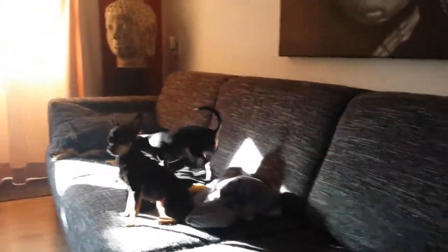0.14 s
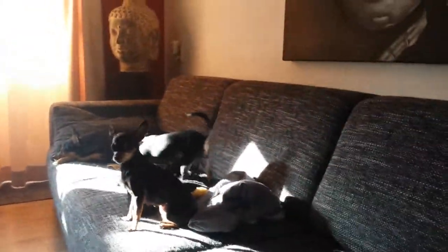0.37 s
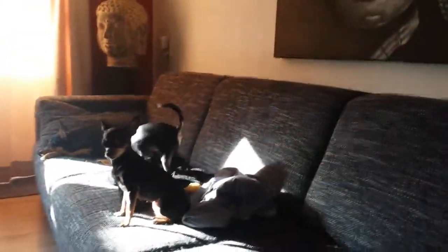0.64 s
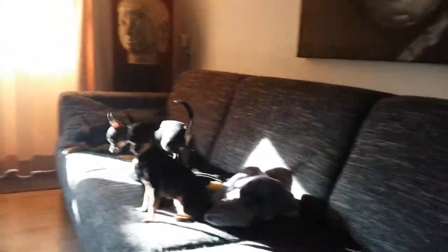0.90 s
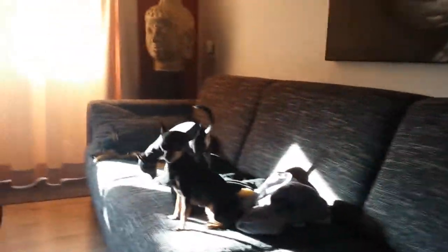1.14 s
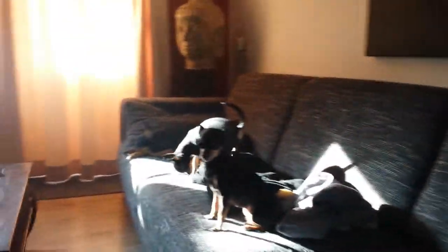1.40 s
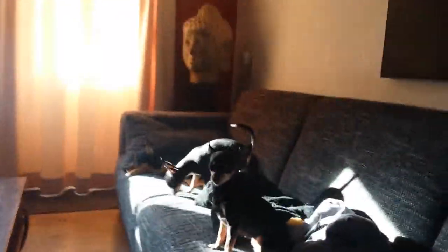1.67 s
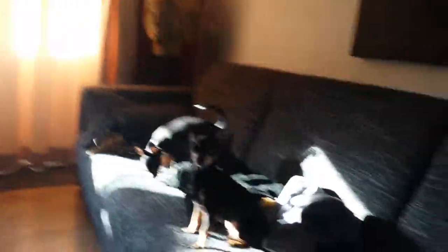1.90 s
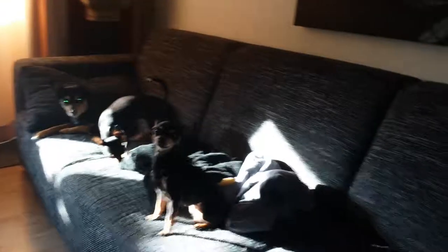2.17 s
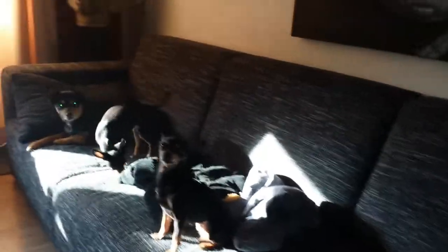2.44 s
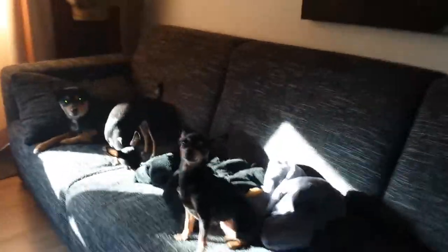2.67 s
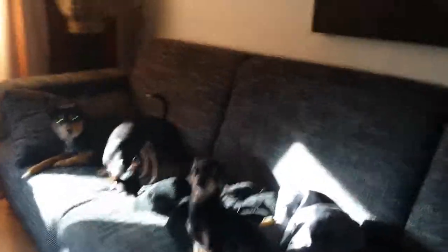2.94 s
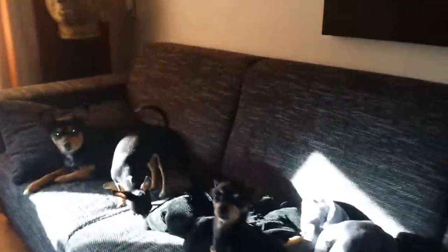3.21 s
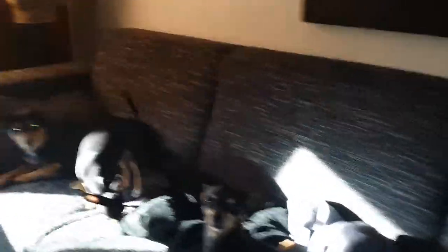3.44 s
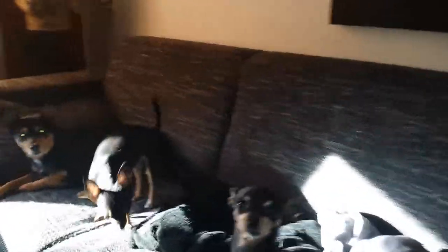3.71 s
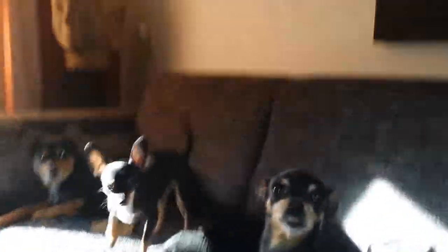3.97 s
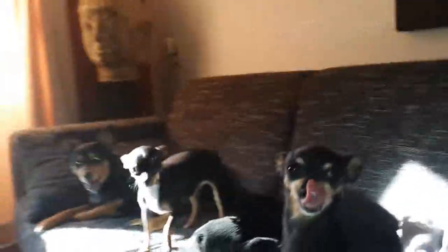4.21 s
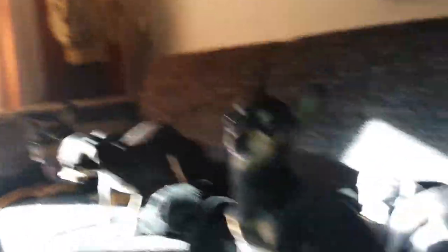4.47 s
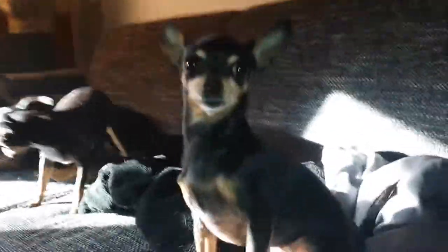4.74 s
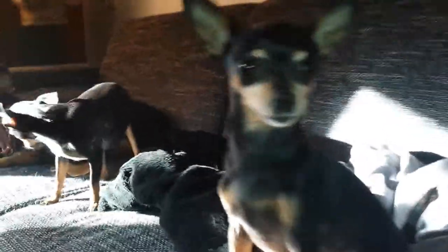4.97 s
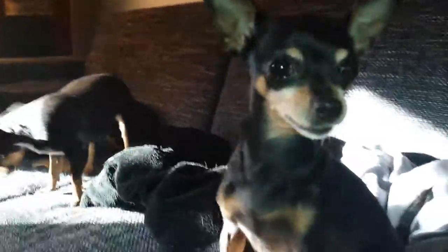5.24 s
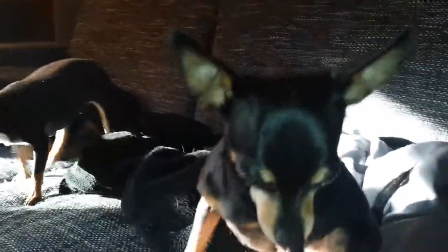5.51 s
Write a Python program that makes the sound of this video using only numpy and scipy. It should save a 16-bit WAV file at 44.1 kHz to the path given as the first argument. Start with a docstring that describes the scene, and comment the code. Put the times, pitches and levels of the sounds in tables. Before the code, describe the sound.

Dry clicks from a gripped device and soft blanket rubbing, then bright ripping scratches as claws pull off fabric, with padded paw thumps and low cushion rumble. The scratches come in spaced bursts and weaken. A dull bump on the sofa frame and handling rumble follow, then a faint wavering hum in a small living room. Wide, uneven handheld stereo.

```python
"""Small dogs scramble on a fabric sofa: grip ticks and rustling cloth (shaped noise) come first, with a few
faint claw snaps (noise bursts) and paw thumps (damped sines); from 0.65 s these grow loud, thinning by 3.5 s.
At 4 s the housing of the hand-held camera wobbles and the sofa frame is knocked (ringing modes); a hand rubs
the housing at 4.3 and 5.2 s (noise and a run of pats). An appliance hum (unsteady sines) wavers, and is
weaker after 4.5 s. Two unlike ports hear it, the left ringing near 6 kHz."""
import sys
import numpy as np
from scipy import signal
from scipy.fft import rfft, irfft, next_fast_len
from scipy.io import wavfile

SR = 44100
rng = np.random.default_rng(int(sys.argv[2]) if len(sys.argv) > 2 else 0)


def to_wav(sig):
    """Store sig (one row per channel, or 1-D mono) as 16-bit WAV at the path in sys.argv[1].

    Samples outside -1..1 are clipped; the rate is SR.
    """
    pcm = np.clip(np.atleast_2d(sig), -1, 1) * 32767
    pcm = np.round(pcm).astype(np.int16)
    wavfile.write(sys.argv[1], SR, pcm.T)  # frames by channels


def ratio(d):
    """dB to gain"""
    e = np.asarray(d, float) / 20
    return 10 ** e


N = 247842


def unit(x):
    """Scale to rms 1."""
    return x / np.sqrt(np.mean(x ** 2) + 1e-20)


def sides(left_db, right_db):
    """Left and right gains as two rows, from constants or curves in dB."""
    return ratio(np.array([left_db, right_db])).reshape(2, -1)


def along(points, hz):
    """Interpolate (Hz, value) points on a log frequency axis."""
    f, v = np.transpose(points)
    return np.interp(np.log(hz + 1), np.log(f + 1), v)


def curves(rows):
    """One value per sample for each column after the time."""
    s, *cols = np.transpose(rows)
    return [np.interp(np.arange(N) / SR, s, c) for c in cols]


def swells(bed_db, s, rise_s, t60_s, db):
    """Level in dB of a bed plus events that climb 25 dB in the rise time and die away; powers add."""
    t = np.arange(0, N + 32, 32) / SR - np.reshape(s, (-1, 1))
    climb_db = -25 * t / rise_s[:, None]
    decay_db = 60 * t / t60_s[:, None]
    drop_db = np.where(t < 0, climb_db, decay_db)
    power = np.sum(ratio(db[:, None] - drop_db) ** 2, axis=0)
    power = np.interp(np.arange(N) / 32, np.arange(power.size), power)
    return 10 * np.log10(ratio(bed_db) ** 2 + power)


def filtered(x, response):
    """x times a complex response of frequency."""
    m = 2 * next_fast_len(x.shape[-1] // 2 + 4096)
    spectrum = rfft(x, m) * response(np.fft.rfftfreq(m, 1 / SR))
    return irfft(spectrum, m)[..., :x.shape[-1]]


def causal(db):
    """Minimum-phase response of a gain curve, by folding its cepstrum."""
    c = irfft(db * np.log(10) / 20)
    half = c.shape[-1] // 2
    c[..., 1:half] *= 2
    c[..., half + 1:] = 0
    return np.exp(rfft(c))


# Port colours. Each row: frequency in Hz, relative gain in dB.
LEFT_PORT = [(300, -19.5), (1000, -15), (1850, -17), (2500, -22.5), (3500, -15), (5000, -6.5), (5900, -3.5),
             (6300, -5), (7200, -21.5), (10000, -27.5), (14000, -53)]
RIGHT_PORT = [(300, -17), (1000, -15.5), (2200, -25.5), (3300, -17.5), (4200, -15.5), (6000, -14.5),
              (7600, -12.5), (8600, -16), (10000, -18.5), (14000, -22.5)]


def ports(x, colour):
    """A source colour as the left and right ports hear it, each response of unit energy."""
    hz = np.fft.rfftfreq(n=4096, d=1 / SR)
    port_db = np.array([along(LEFT_PORT, hz), along(RIGHT_PORT, hz)])
    ring = irfft(causal(along(colour, hz) + port_db))
    ring = ring / np.linalg.norm(ring, axis=1, keepdims=True)
    return signal.oaconvolve(x, ring, axes=1)[:, :N]


# Likeness of the channels. Each row: frequency in Hz, left-right likeness from 0 to 1.
LIKENESS = [(40, 0.18), (130, 0.78), (300, 0.91), (650, 0.5), (1400, .15), (4000, 0.039)]


def rush(grit_db, per_s):
    """Stereo noise, alike in the bass, whose level wanders between random values, per_s of them a second."""
    jumps_db = grit_db * rng.standard_normal(size=8192)
    level_db = np.interp(np.arange(N) * per_s / SR, np.arange(jumps_db.size), jumps_db)
    pair = unit(rng.standard_normal((2, N)) * ratio(level_db))

    def mid_side(hz):
        turn = np.arccos(np.clip(along(LIKENESS, hz), 0, 1)) / 2
        return np.array([np.cos(turn), np.sin(turn)])

    mid, side = filtered(pair, mid_side)
    return np.array([mid + side, mid - side])


def blows(times_s, level_db, life_s, low_hz, high_hz):
    """Noise bursts that swell and fade, sized by their energy in a band; one row of levels per channel."""
    life_s = np.reshape(life_s, (-1, 1))
    u = np.arange(512) / SR / life_s
    burst = rng.standard_normal((len(times_s), u.shape[1])) * (u + 0.32) * np.exp(-u)
    hz = np.fft.rfftfreq(u.shape[1], 1 / SR)
    in_band = np.abs(rfft(burst)[:, (hz > low_hz) & (hz < high_hz)]) ** 2
    energy = SR * (0.00015 + 0.22 * life_s)  # the port's ring plus the burst's own length
    burst *= np.sqrt(energy / in_band.mean(axis=1, keepdims=True))
    start = np.round(np.asarray(times_s) * SR).astype(int)
    at = (start[:, None] + np.arange(u.shape[1])).ravel()
    gains = ratio(np.array(level_db))
    return np.array([np.bincount(at, (burst * g[:, None]).ravel(), N + SR)[:N] for g in gains])


# Room decay. Each row: frequency in Hz, t60 in seconds.
ROOM_T60 = [(200, 0.2), (1000, 0.88), (4000, 0.56), (10000, 0.043), (15000, 0.39)]


def room(x, early_db, gap_s):
    """Diffuse room answer, a new noise tail every quarter second; each frequency dies at its own speed."""
    step, out = SR // 4, np.zeros((2, N + 2 * SR))
    for at in range(0, N, step):
        hz, t, z = signal.stft(rng.standard_normal((2, SR // 2)), SR, nperseg=256)
        late = ratio(-60 * t / along(ROOM_T60, hz)[:, None])
        early = 1 + ratio(early_db - 60 * t / 0.024)
        shape = late * early * np.clip(t / gap_s, 0, 1)
        tail = signal.istft(z * shape, SR, nperseg=256)[1]
        wet = signal.fftconvolve(x[:, at:at + step], tail / np.linalg.norm(tail[0]), axes=1)
        out[:, at:at + wet.shape[1]] += wet
    return out[:, :N]


# Paws drag over the cover. Each row: time of full strength in seconds, rise in seconds, t60 in seconds,
# weave hiss in dB at the right, duller scuff in dB at the right.
STROKE_ROWS = [(.128, 0.43, 0.12, -51.5, -50.5), (.155, 0.066, 0.061, -64, -45.5),
               (.277, 0.16, 0.73, -51.5, -53.5), (.545, 0.032, 0.24, -27.5, -40.5),
               (.595, 0.15, 0.2, -27, -40), (0.655, 0.0078, 0.38, -24.5, -41.5),
               (0.689, 0.03, 0.56, -21.5, -41), (.737, 0.059, 0.21, -37, -52),
               (0.941, 0.0055, 0.2, -32.5, -50), (1.266, 0.0055, 0.49, -32.5, -48),
               (1.517, 0.0035, 0.47, -28, -46.5), (1.576, .05, 0.9, -45.5, -54),
               (1.701, .005, 0.28, -35.5, -54), (1.735, .03, 0.57, -39.5, -56),
               (2.167, 0.026, 0.59, -37, -49), (2.368, 0.046, 0.45, -52, -47.5),
               (2.467, 0.015, 0.38, -31, -46), (2.615, 0.094, 0.26, -41.5, -69),
               (2.707, 0.0069, 0.55, -38.5, -52.5), (2.773, 0.12, 0.34, -55, -60),
               (3.097, 0.029, 0.34, -42, -53), (3.305, 0.019, 0.56, -55, -61.5),
               (3.473, 0.092, 1.7, -56, -53), (3.7, 0.064, 0.95, -45, -64),
               (4.878, 0.094, 0.52, -70, -72.5), (5.407, 0.056, 0.18, -66.5, -93)]
# Restless bed under the strokes. Each row: time in seconds, hiss in dB at the right, scuff in dB at the right
# before its swells, rumble in dB at the left, base level of faint grip ticks in dB at the left.
BED = [(0, -61, -55, -58, -46), (.2, -64, -61, -71, -52), (.45, -47.5, -54, -52.5, -31),
       (1.05, -45.5, -57, -57.5, -37), (1.24, -48.5, -53.5, -66, -38), (1.45, -62, -59, -69, -37.5),
       (1.9, -50.5, -54, -63, -30.5), (2.14, -52.5, -59.5, -69, -36.5), (2.4, -61, -70, -69, -34.5),
       (2.9, -60, -54, -56, -37), (3.3, -66.5, -59, -58.5, -41), (3.6, -55.5, -60, -61, -45.5),
       (4.42, -57, -59, -60.5, -51), (4.55, -70.5, -68, -65, -44), (4.8, -80, -77.5, -72, -52),
       (5.45, -89.5, -88, -71, -55), (5.62, -90, -70, -68.5, -53)]


def hiss_level():
    """Level of the weave hiss in dB at the right: strokes over the bed."""
    s, rise_s, t60_s, hiss_db, _ = np.transpose(STROKE_ROWS)
    return swells(curves(BED)[0], s, rise_s, t60_s, hiss_db)


# Claws leaving the weave. Each row: time in seconds, level in dB at the right.
SNAP_ROWS = [(0.019, -26), (0.1245, -24), (0.287, -33), (.654, -5.5), (0.671, -4), (0.693, -11),
             (0.7407, -8.5), (0.751, -11.5), (0.939, -14), (0.9466, -26.5), (1.2636, -11), (1.2764, -14),
             (1.328, -22), (1.5141, -9.5), (1.5208, -14), (1.532, -24.5), (1.7015, -20.5), (1.7268, -22.5),
             (1.7419, -19.5), (1.876, -29.5), (2.169, -22), (2.1779, -22), (2.4638, -14.5), (2.4729, -21),
             (2.7034, -31), (2.71, -34), (3.0873, -34)]
# Colour of the weave, also of its hiss. Each row: frequency in Hz, relative level in dB per Hz.
WEAVE_COLOUR = [(1000, -45.5), (2500, -8.5), (3400, -12.5), (4100, -5), (9000, -2), (15000, -13.5)]


def claws():
    """Each snap is two threads letting go; picked threads crackle at the hiss level; the room answers snaps."""
    left_over_right_db, left_lag_s = 5, .0001
    thread_s, thread_db = .0022, -6.5  # second thread after the snap
    pick_db, pick_spread_db = -7.5, 1  # picked threads over the hiss
    s, db = np.transpose(SNAP_ROWS)
    plain = blows(s, [db + 3.5, db - 0.5], life_s=.000005, low_hz=4000, high_hz=9000)

    draws = rng.random(size=(2200, 2))
    s_pick = draws[:, 0] * N / SR
    hiss_db = hiss_level()[(draws[:, 0] * N).astype(int)]
    db_pick = hiss_db + pick_db - pick_spread_db * np.log(draws[:, 1]).clip(-3)

    s = np.r_[s - .0004, s + thread_s, s_pick + .001]
    db = np.r_[db, db + thread_db, db_pick]
    left, right = blows(s, [db + left_over_right_db, db], life_s=0.00095, low_hz=4000, high_hz=9000)
    direct = np.array([np.roll(left, round(left_lag_s * SR)), right])
    return ports(direct + room(plain, early_db=-26.5, gap_s=0.0097), WEAVE_COLOUR)


# Bodies shift weight, cushions rumble. Each row: time of full strength in seconds, rise in seconds,
# t60 in seconds, level in dB at the left.
SHIFT_ROWS = [(.153, 0.18, 0.22, -36.5), (.55, 0.18, 0.8, -50), (0.719, 0.11, 0.53, -36.5),
              (1.334, 0.45, 0.32, -54.5), (1.518, 0.022, 0.82, -50.5), (1.74, 0.39, 0.51, -47),
              (1.88, .15, 0.47, -53), (2.23, 0.48, .6, -51.5), (2.369, 0.035, 2.3, -55),
              (2.754, 0.039, 0.34, -42), (3.29, .02, 0.51, -52), (3.365, 0.061, 0.91, -49.5),
              (3.9, 0.18, 0.58, -48.5), (4.019, 0.011, 0.65, -41), (4.85, .03, 0.45, -58.5)]
# Colours of scuff and rumble. Each row: frequency in Hz, relative level in dB per Hz.
SCUFF_COLOUR = [(500, -8), (1000, -9.5), (1700, -3), (2000, -2), (2400, -1.5), (5000, -19)]
RUMBLE_COLOUR = [(40, -29.5), (120, 1.5), (250, 3), (400, -2), (650, -6), (1200, -30.5)]


def cloth():
    """Blanket and sofa cover rub: gritty hiss, duller scuff, low rumble, all shaped noise."""
    s, rise_s, t60_s, _, db = np.transpose(STROKE_ROWS)
    _, scuff_bed_db, rumble_bed_db, _ = curves(BED)
    hiss_db = hiss_level()
    scuff_db = swells(scuff_bed_db, s, rise_s, 1.24 * t60_s, db)  # scuff outlasts the hiss
    rumble_db = swells(rumble_bed_db, *np.transpose(SHIFT_ROWS))
    hiss = sides(hiss_db + 3.0, hiss_db) * ports(rush(grit_db=1.5, per_s=300), WEAVE_COLOUR)
    scuff = sides(scuff_db + 4.5, scuff_db) * ports(rush(grit_db=2, per_s=120), SCUFF_COLOUR)
    rumble = sides(rumble_db, rumble_db - 2.0) * ports(rush(grit_db=3.5, per_s=70), RUMBLE_COLOUR)
    return hiss + scuff + rumble


# Paws on the cushions. Each row: time in seconds, pad peak in dB before the port gains, pad pitch in Hz.
THUMP_ROWS = [(0.132, -38, 610), (0.148, -34, 390), (0.574, -26, 396), (0.655, -23.5, 377),
              (0.671, -26, 260), (0.685, -30, 330), (0.698, -27, 197), (0.707, -28.5, 333),
              (0.722, -35, 200.5), (0.774, -38, 200), (1.514, -38.5, 355), (1.637, -33.5, 354),
              (1.656, -40.5, 248), (1.721, -39, 575), (1.813, -39.5, 245), (1.868, -38.5, 358),
              (1.894, -48, 188), (2.476, -38, 328), (2.736, -32.5, 294), (2.887, -41, 320),
              (3.291, -41, 303), (3.355, -29.5, 349), (3.383, -36, 327), (3.42, -43.5, 261),
              (4.031, -34, 147), (4.338, -33, 193), (4.836, -49, 171), (4.868, -56.5, 112.5)]
# Cushion resonances. Each row: frequency in Hz, width in Hz, relative gain in dB.
CUSHION_MODES = [(191, 38, -7), (355.5, 76, 7.5), (610, 330, -7)]


def paws():
    """The pressed pad of stuffing rings a few cycles; the push sets the cushion's low resonances going."""
    die_cycles, rise_cycles, contact_cycles = 13, .9, .15  # dies by 60 dB
    body_db = 26  # gain of the cushion under the pad
    s, db, hz = np.transpose(THUMP_ROWS)
    cycles = np.arange(2048) / SR * hz[:, None]
    swell = (1 - np.exp(-cycles / rise_cycles)) * ratio(-60 * cycles / die_cycles)
    ring = -np.sin(2 * np.pi * cycles) * swell
    shove = cycles * np.exp(-cycles / contact_cycles)
    at = np.round((s - .002) * SR).astype(int)[:, None] + np.arange(cycles.shape[1])

    def place(rows, size):
        scaled = rows * (ratio(db) / size)[:, None]
        return np.bincount(at.ravel(), scaled.ravel(), N)[:N] * sides(1.5, -1.0)

    def body(f):
        total = 0
        for k, (centre, width, gain_db) in enumerate(CUSHION_MODES):
            mode = 1j * f * width / (centre * centre - f * f + 1j * f * width)
            total = total + (-1) ** k * ratio(gain_db) * mode
        return total

    pad = place(ring, np.abs(ring).max(axis=1))
    cushion = filtered(place(shove, shove.sum(axis=1)), body)
    thud = pad - ratio(body_db) * cushion
    return thud + ratio(-12.0) * room(thud, early_db=1, gap_s=.006)


# Landing bodies press air out of the stuffing. Each row: time of full strength in seconds, rise in seconds,
# t60 in seconds, level in dB rms at the right.
PUFF_ROWS = [(0.128, 0.018, 0.29, -36), (0.535, 0.065, 0.32, -36.5), (.654, 0.0045, 0.29, -44.5),
             (1.722, 0.0033, .17, -42.5), (1.811, 0.005, 0.27, -46.5), (2.365, .004, 0.72, -49),
             (2.758, 0.003, 0.2, -42), (4.016, .004, 0.24, -36), (4.075, .03, 0.17, -45)]
# Colour of the puffs. Each row: frequency in Hz, relative level in dB per Hz.
PUFF_COLOUR = [(80, -16.5), (250, -3.5), (600, 6.5), (1000, -4), (1500, -7), (2500, -2.5), (3200, -32)]


def landings():
    """Air pressed out by each landing dies away as dull, lumpy noise."""
    air_db = swells(-120, *np.transpose(PUFF_ROWS))
    return sides(air_db + 2.5, air_db) * ports(rush(grit_db=1.0, per_s=200), PUFF_COLOUR)


# Something hard meets the frame. Each row: time in seconds, level in dB before the port gains.
KNOCK_ROWS = [(4.0125, -30), (4.067, -41)]
# Modes of the sofa's wooden frame. Each row: frequency in Hz, mean relative level in dB, t60 in seconds.
FRAME_MODES = [(115, 2, 0.11), (187, -4.5, 0.055), (560, -10.5, 0.13), (705, -5.5, .08), (810, -8, 0.12),
               (1048, -7.5, 0.086), (1370, -12, 0.094), (1700, -16.5, .1), (2040, -23, .12),
               (2207, -20, .12)]


def frame():
    """Each knock rings the frame's modes at new strengths and phases."""
    t, out = np.arange(SR // 4) / SR, np.zeros(N + SR)
    for s, db in KNOCK_ROWS:
        ring = np.zeros(t.size)
        for hz, mode_db, t60_s in FRAME_MODES:
            level = ratio(db + mode_db + rng.normal(0, 2.1) - 60 * t / t60_s)
            ring += level * np.sin(2 * np.pi * hz * t + rng.normal(0, 1))
        out[round(s * SR):][:t.size] += ring * (1 - np.exp(-t / 0.0011))
    pair = out[:N] * sides(1.5, -1.5)
    return pair + ratio(-10.5) * room(pair, early_db=7.5, gap_s=0.0048)


# The grip creeps on the housing. Each row: time in seconds, tick level in dB at the left,
# low knock in dB relative to the tick.
TICK_ROWS = [(0.0559, -14, -37), (0.2732, -21.5, -24), (0.335, -23, -8.5), (0.3535, -22, -15),
             (.3956, -24, -29.5), (.413, -23, -28), (.452, -19, -15), (.5, -19, -29.5), (0.532, -17, -42),
             (0.544, -4, -39.5), (0.5644, -14, -39), (0.586, -6.5, -37.5), (1.2455, -25, -20),
             (1.483, -29, -7), (1.723, -13.5, -6), (1.8134, -14, -9), (1.882, -20.5, -3.5),
             (2.076, -19, -6.5), (2.2916, -23.5, -12), (2.3886, -22.5, -17), (2.8087, -22, -6),
             (2.827, -19.5, -4), (2.839, -22, -11), (2.853, -20.5, -9), (2.877, -23.5, -8.5),
             (2.9997, -23, -6), (3.0318, -25, -2), (3.609, -25, -1.5), (3.8488, -28, -7),
             (3.9361, -24.5, -5), (4.0775, -19.5, -10), (4.2463, -23, -8.5), (4.3358, -13.5, 3.5),
             (4.368, -18, -14), (4.6648, -32.5, -5), (4.7587, -41.5, 0), (5.143, -47.5, -11),
             (5.166, -43, -7), (5.2, -48, -1), (5.234, -34, -6), (5.2796, -37.5, -7), (5.306, -44, -1)]
# Colours of a slipping fingertip and a housing knock. Each row: frequency in Hz, relative level in dB per Hz.
SLIP_COLOUR = [(1000, -45.5), (3500, -25), (5000, -6.5), (6000, -0.5), (7500, 3.5), (12000, -1.5),
               (15000, -11.5)]
HOUSING_COLOUR = [(150, -5.5), (1000, -2.5), (1400, -2.5), (1800, -2), (2300, -1.5), (4000, -7.5),
                  (6000, -33.5)]


def grip():
    """Dry ticks carried by the housing, mostly to the left port, among many fainter ones."""
    s, db, knock_db = np.transpose(TICK_ROWS)
    draws = rng.random(size=(560, 2))
    s_faint = (draws[:, 0] * N + 512) / SR
    base_db = curves(BED)[3][(draws[:, 0] * N).astype(int)]
    db_faint = base_db + np.minimum(-2.8 * np.log(draws[:, 1]), 11)
    s, db = np.r_[s, s_faint], np.r_[db, db_faint]
    knock_db = np.r_[knock_db, np.full(len(draws), -9.5)]
    life_s = .00002 * ratio(-knock_db - 5.5)  # soft slips knock less and last longer
    slip = blows(s - .0003 - life_s, [db, db - 26.0], life_s, low_hz=4520, high_hz=6940)
    knock_levels = [db + knock_db, db + knock_db - 22.5]
    knock = blows(s - .0003, knock_levels, life_s=.00004, low_hz=800, high_hz=2800)
    return ports(slip, SLIP_COLOUR) + ports(knock, HOUSING_COLOUR)


# A hand rubs at the left port. Each row: start in seconds, end in seconds, level of the pats in dB at the left.
RUB_ROWS = [(4.256, 4.485, -42.5), (5.155, 5.314, -58.5)]
# Deep wobble of the hand-held housing. Each row: time in seconds, mean level of the ports in dB.
SWAY_ROWS = [(0, -62.5), (.7, -75), (1, -67), (3.7, -70.5), (3.85, -54), (3.99, -51), (4.02, -44),
             (4.15, -64.5), (4.35, -52), (4.6, -74), (4.81, -80), (4.85, -62), (4.95, -74.5), (5.62, -80.5)]
# Colours of skin on the housing and of the wobble. Each row: frequency in Hz, relative level in dB per Hz.
PALM_COLOUR = [(40, -20.5), (110, -4), (200, 6), (400, -2.5), (700, -21), (1200, -31.5)]
DEEP_COLOUR = [(10, -25.5), (40, -8), (100, -4.5), (170, -11.5), (300, -49)]


def hand():
    """The housing wobbles deeply; twice the hand rubs, sticking and slipping in a quick run of pats."""
    judder_hz, scatter_cycles, edge_s = 58, .04, .05
    t = np.arange(N) / SR
    rub = np.zeros(N)
    for start_s, end_s, db in RUB_ROWS:
        inside_s = np.minimum(t - start_s, end_s - t)
        rub += ratio(db) * np.clip(inside_s / edge_s + .5, 0, 1) ** 2
    rub = rub * sides(0, -17.)
    count = int(N / SR * judder_hz)
    at = (np.arange(count) + scatter_cycles * rng.standard_normal(count)) * SR / judder_hz
    strength = ratio(2.1 * rng.standard_normal(count))
    pats = unit(np.bincount(at.clip(0).astype(int), strength, N)[:N])
    skin = pats + ratio(-3.5) * rush(grit_db=0.2, per_s=55)
    sway_db = curves(SWAY_ROWS)[0]
    sway = sides(sway_db + 2.5, sway_db - 2.5) * ports(rush(grit_db=0.5, per_s=21), DEEP_COLOUR)
    return ports(rub * skin, PALM_COLOUR) + sway


# A faint airy band comes and goes. Each row: time in seconds, centre in Hz, level in dB at the right.
AIRY_ROWS = [(.75, 1700, -85), (.85, 1650, -53), (1.15, 1480, -61.5), (1.25, 1500, -87), (2.9, 1850, -79),
             (3.05, 1880, -63), (3.45, 1880, -60.5), (3.7, 1880, -77), (4.45, 1870, -62), (4.7, 1870, -83),
             (5.5, 1860, -84.5), (5.58, 1860, -74.5)]


def airy():
    """Narrow noise: slow noise pairs modulate a carrier at a slowly moving centre."""
    hz, db = curves(AIRY_ROWS)
    slow = unit(filtered(rng.standard_normal((2, 2, N)), lambda f: 1 / (1 + (f / 120) ** 2)))
    turn = 2 * np.pi * np.cumsum(hz) / SR
    return sides(db + 3, db) * (slow[0] * np.cos(turn) + slow[1] * np.sin(turn))


# Motor lines. Each row: frequency in Hz, level in dB rms before the background gain, line width in Hz.
HUM_LINES = [(220.7, -72, 3), (667.5, -78, 1), (694.4, -83, 1.5)]
# Background levels wander, lower after 4.5 s. Each row: time in seconds, mean hum gain in dB,
# preamplifier hiss in dB rms.
BACKGROUND = [(0, 13, -57), (.5, 8, -64), (1.4, 8.5, -86), (1.7, 6, -72), (3.6, 8.5, -60),
              (4.4, 4.5, -60.5), (4.6, 1.5, -67), (5.62, -2, -70)]


def hum():
    """Appliance motor lines, slightly unsteady: each phase takes a random walk."""
    t = np.arange(N) / SR
    tone = np.zeros(N)
    for hz, db, width_hz in HUM_LINES:
        drift = np.cumsum(rng.standard_normal(N)) * np.sqrt(2 * np.pi * width_hz / SR)
        tone += ratio(db) * np.sqrt(2) * np.sin(2 * np.pi * hz * t + drift)
    gain_db = curves(BACKGROUND)[0]
    return tone * sides(gain_db + 2.5, gain_db - 3)


def scene():
    """All sources as they reach the two ports."""
    return claws() + cloth() + paws() + landings() + frame() + grip() + hand() + airy() + hum()


def roll_off(x):
    """The treble ends steeply here."""
    return signal.sosfilt(signal.butter(12, 15510, fs=SR, output="sos"), x)


def record(dry):
    """Preamplifier hiss, a hard ceiling and a steep band limit from 14.5 kHz."""
    hiss = ratio(curves(BACKGROUND)[1]) * rng.standard_normal(dry.shape)
    limited = np.clip(dry + hiss, -1, 1)
    mix = filtered(limited, lambda hz: ratio(-np.clip((hz - 14500) / 25, 0, 45)))
    return roll_off(mix)


dry = scene()
out = record(dry)
to_wav(out)
```